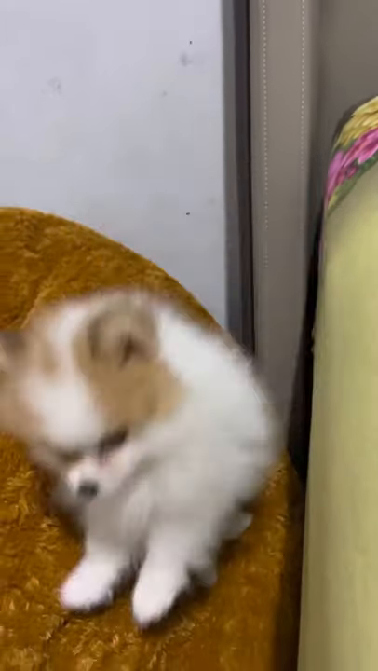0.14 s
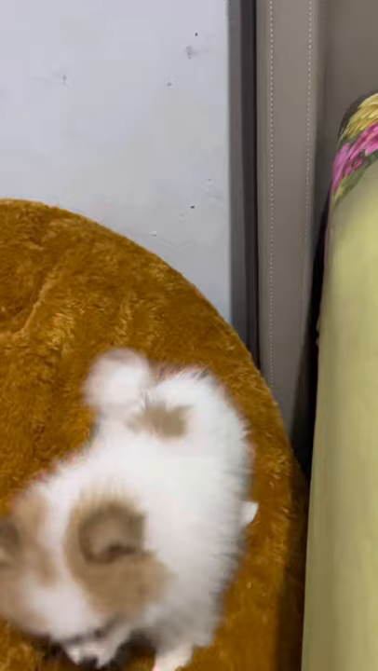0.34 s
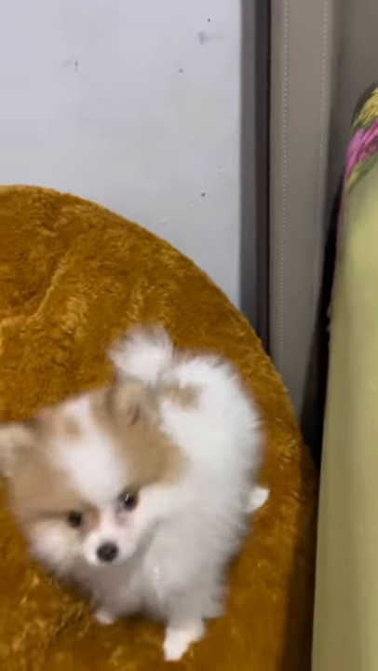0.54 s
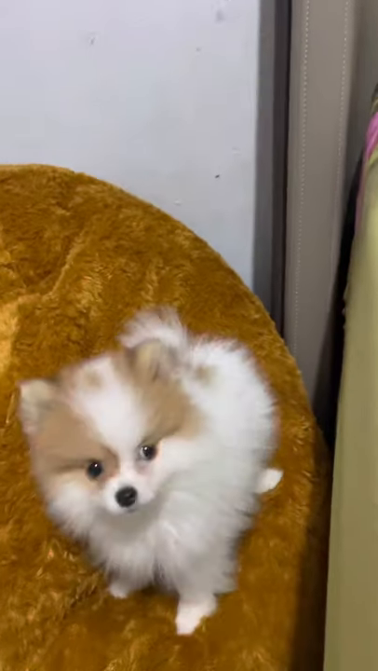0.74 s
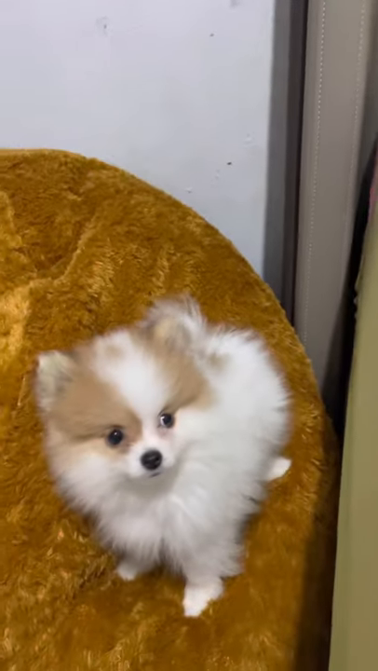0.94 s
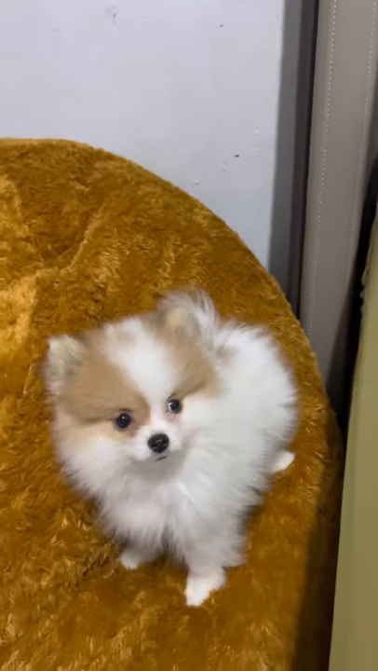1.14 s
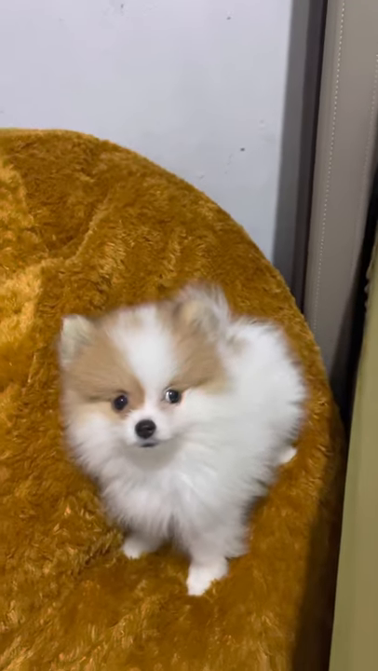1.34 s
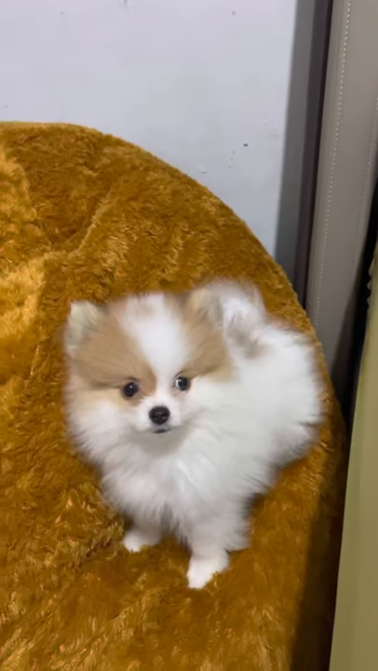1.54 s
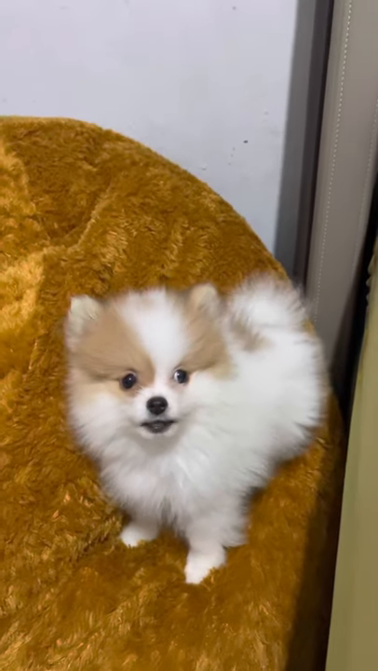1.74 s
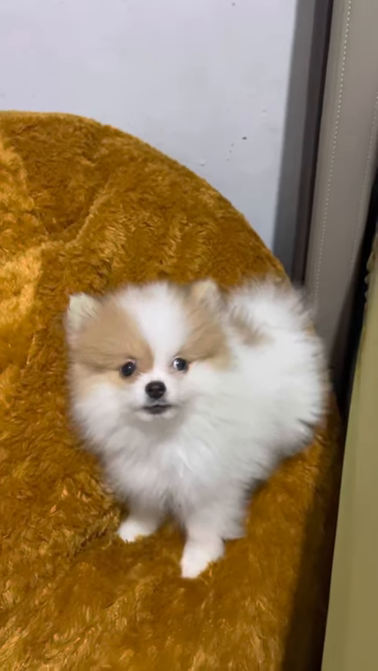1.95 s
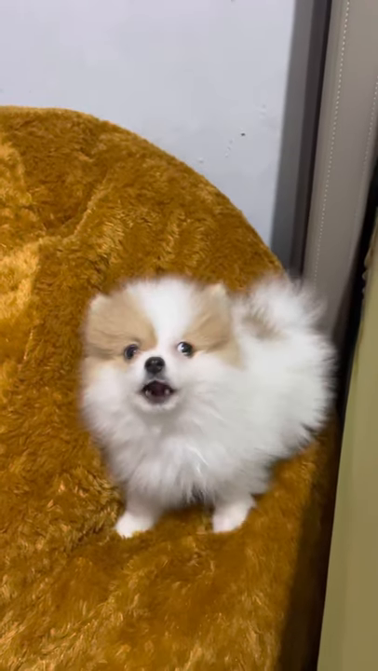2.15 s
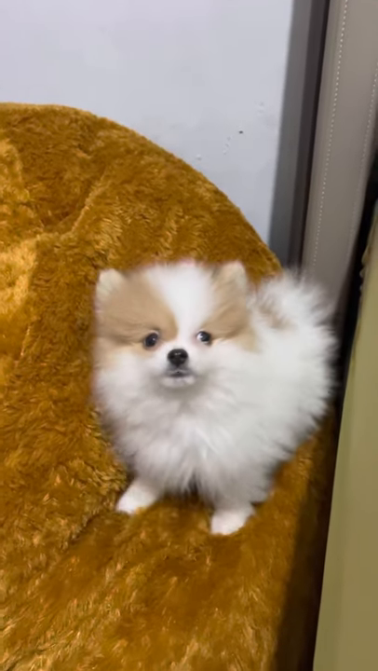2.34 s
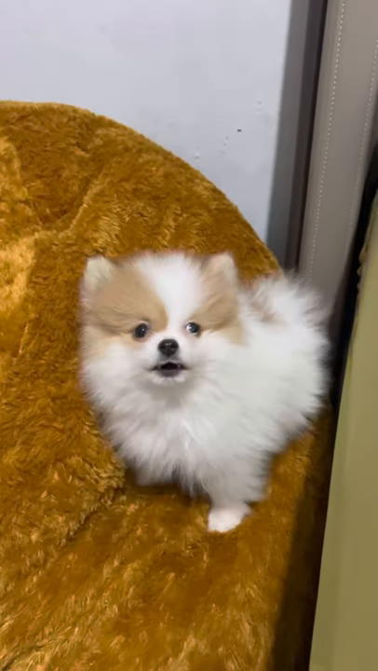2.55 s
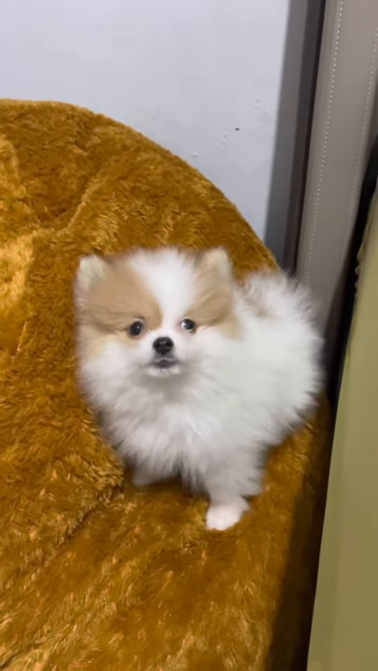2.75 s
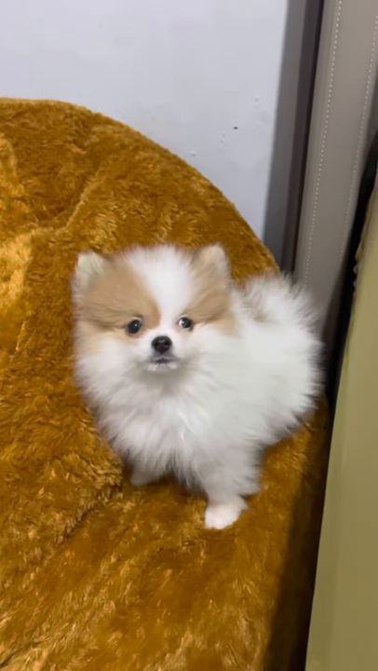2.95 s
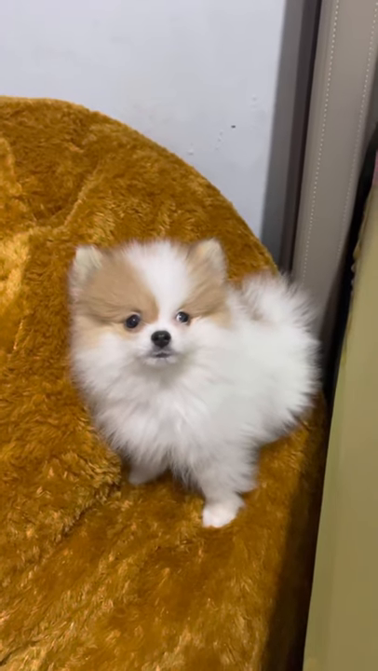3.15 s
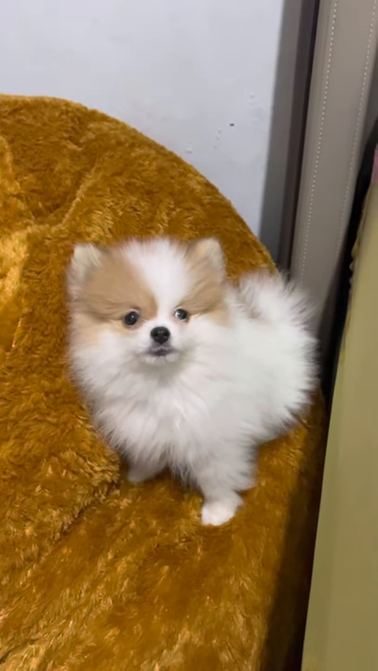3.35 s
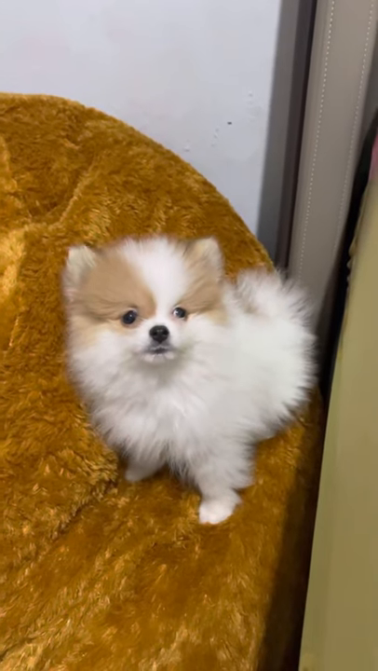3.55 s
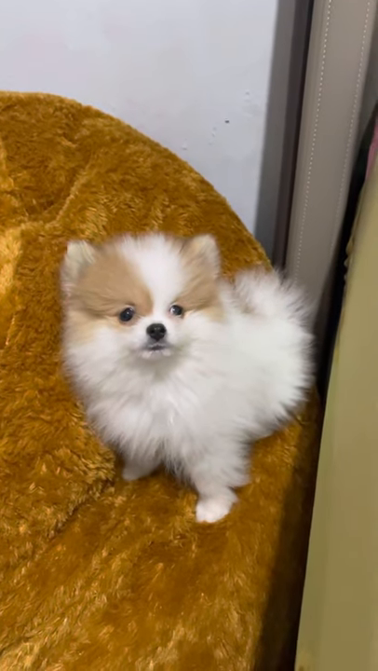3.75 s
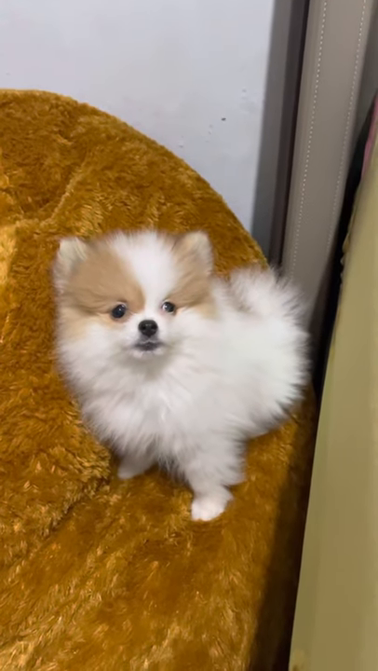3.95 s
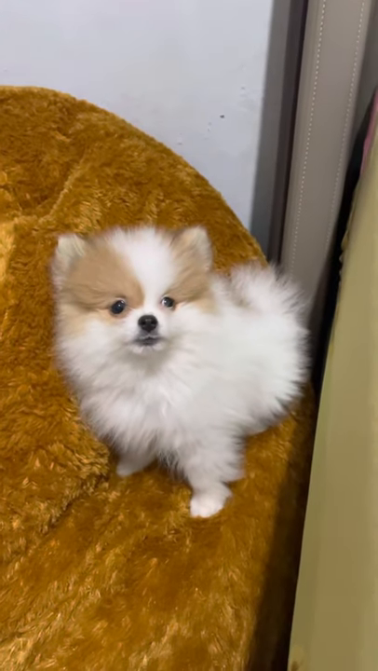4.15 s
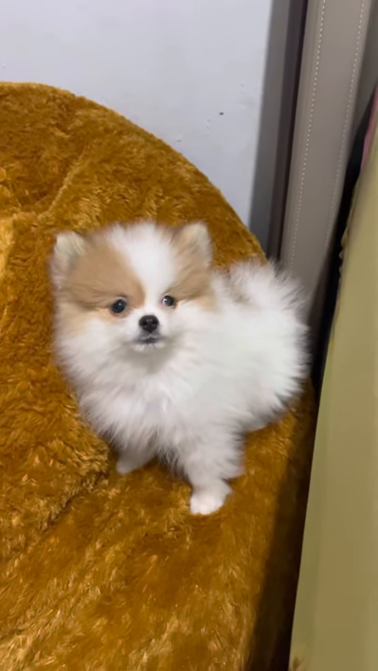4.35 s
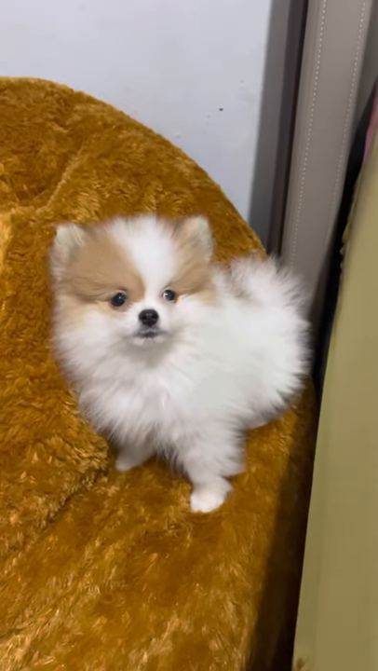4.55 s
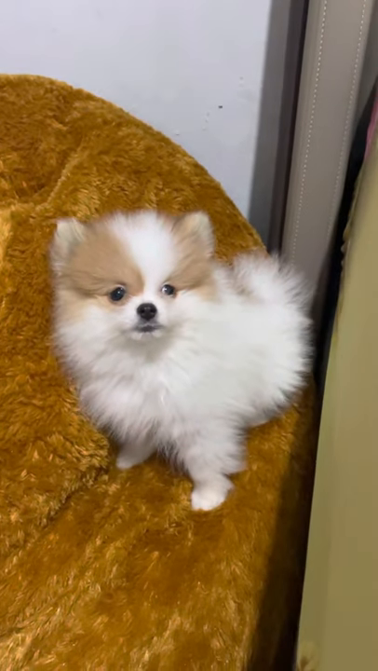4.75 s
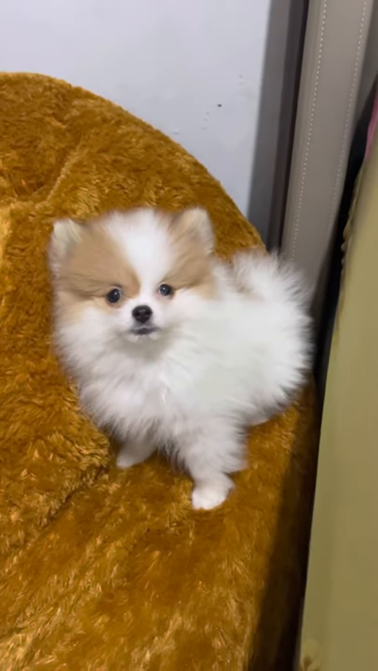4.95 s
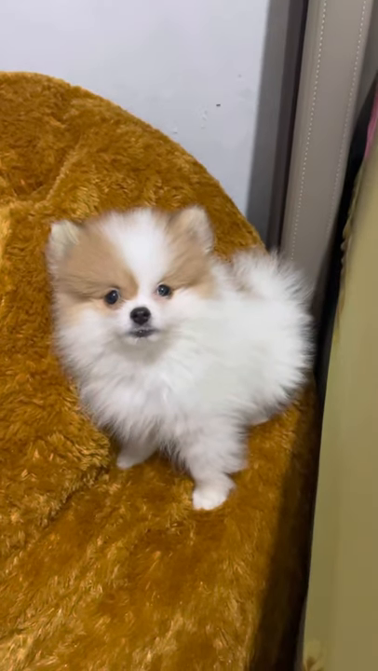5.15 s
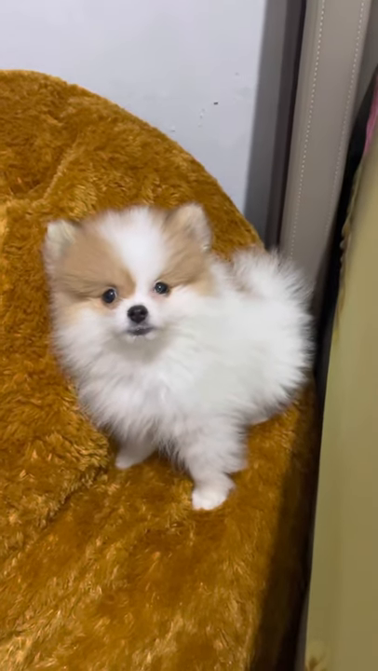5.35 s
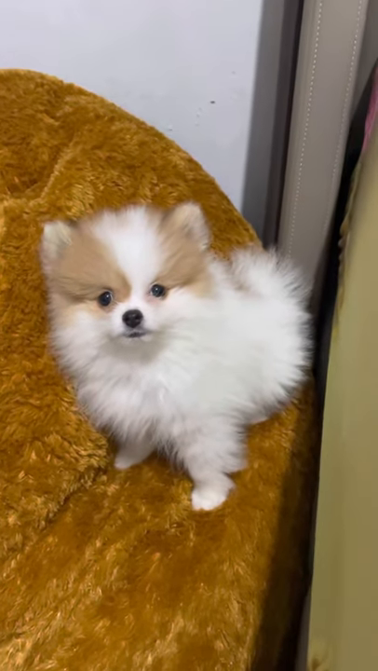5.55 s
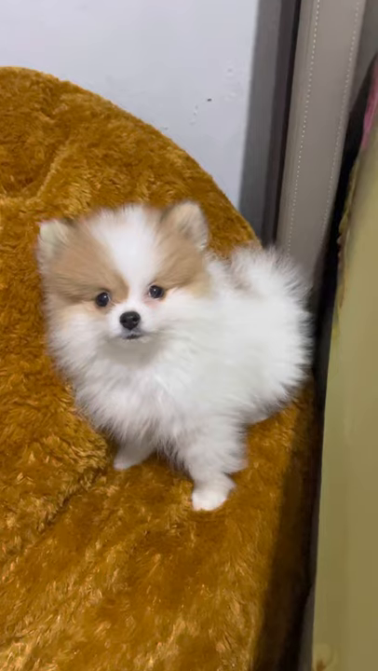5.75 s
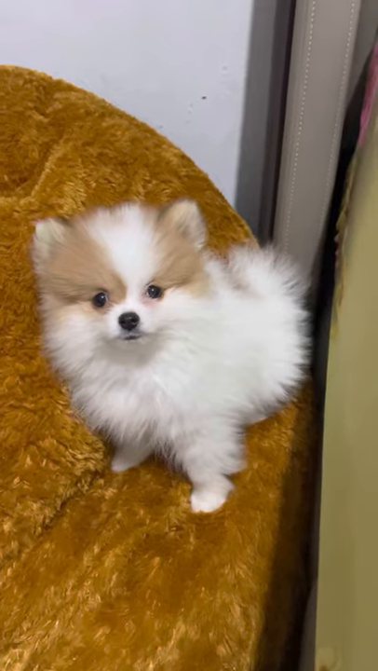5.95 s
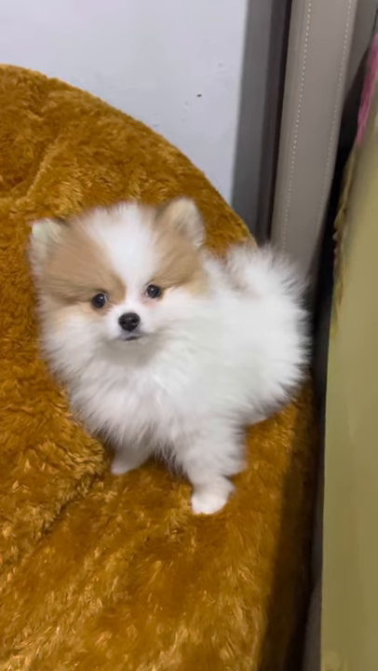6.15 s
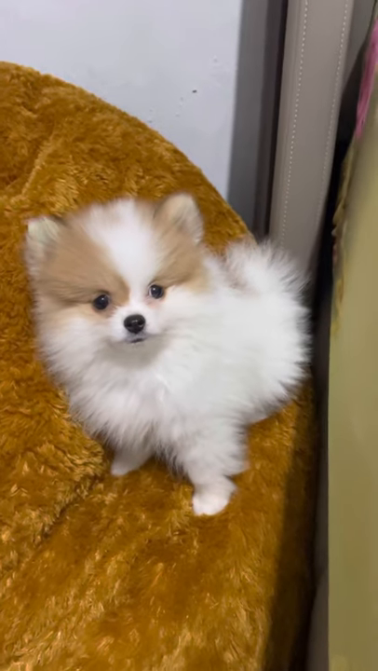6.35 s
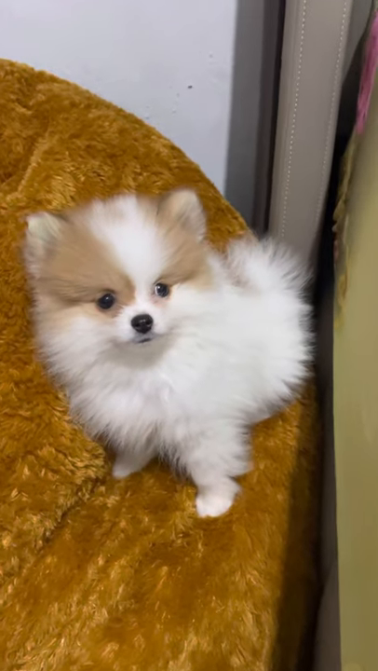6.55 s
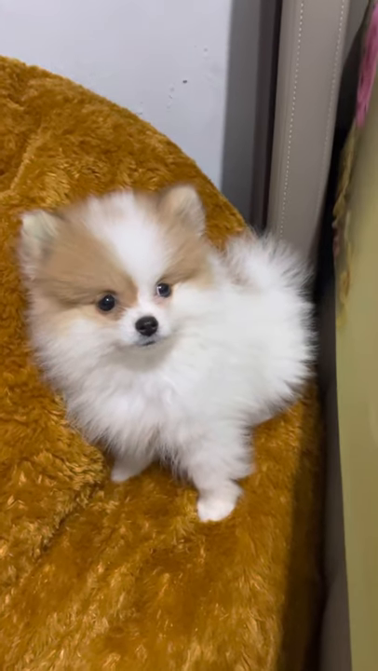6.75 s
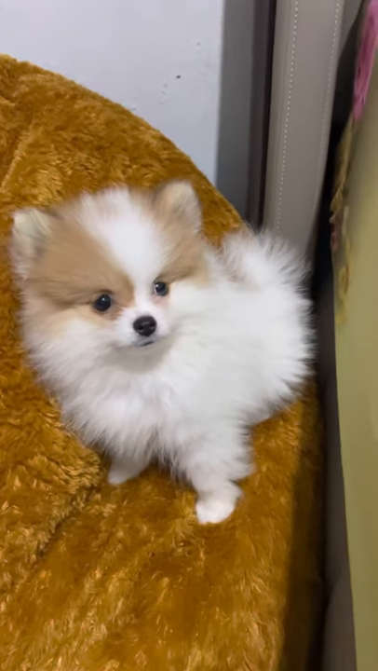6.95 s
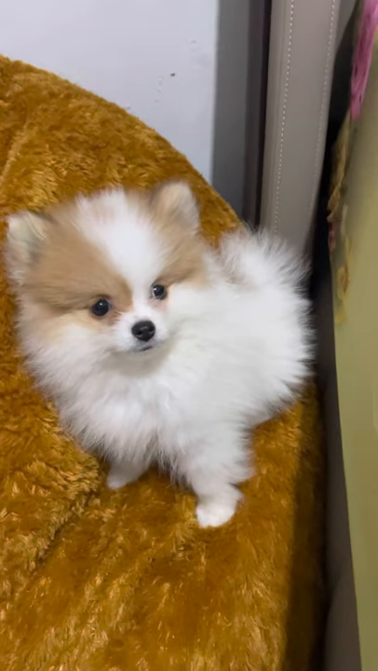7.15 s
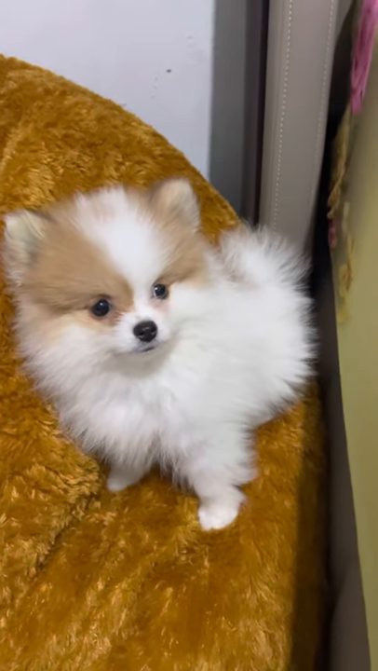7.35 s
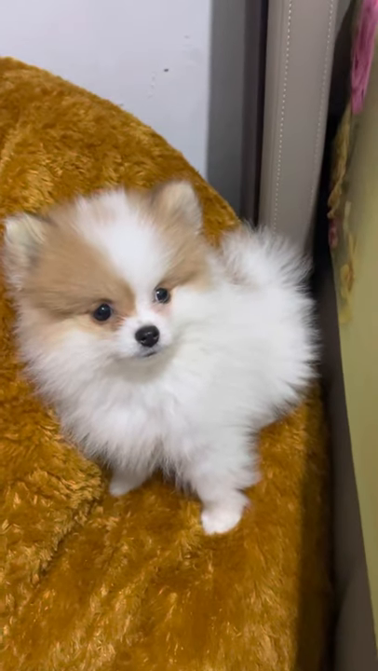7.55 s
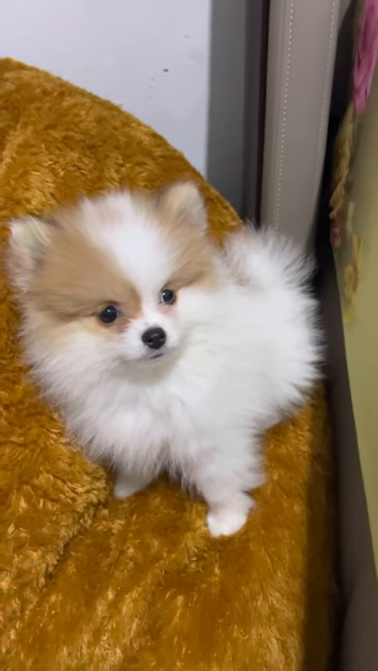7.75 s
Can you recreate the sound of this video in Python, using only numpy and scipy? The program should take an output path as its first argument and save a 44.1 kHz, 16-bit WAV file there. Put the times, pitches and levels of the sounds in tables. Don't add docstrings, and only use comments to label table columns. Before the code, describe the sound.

A small fluffy puppy vocalises near the microphone indoors. Brief fur and cloth rustling comes first, then barely audible peeps and a thin squeak leading into the loudest yelp. Next come a nasal whine, a quick yap breaking into throaty grumbling, a sliding wail with a low groan, and tiny descending whimpers. After that only faint motor hum and soft room noise continue.

```python
import sys
import numpy as np
from scipy import signal
from scipy.fft import rfft, irfft, next_fast_len
from scipy.io import wavfile
from scipy.ndimage import uniform_filter1d

SR = 44100
rng = np.random.default_rng(int(sys.argv[2]) if len(sys.argv) > 2 else 0)


def gain_from_db(level_db):
    decades = np.asarray(level_db, float) / 20
    return 10 ** decades


def bounce(signal):
    frames = np.transpose(np.atleast_2d(signal))
    limited = np.clip(frames, -1, 1)
    pcm = np.round(limited * 32767).astype(np.int16)
    wavfile.write(sys.argv[1], SR, pcm)


N = 343655

# start_s, pitch_hz, effort_db, mouth_opening_0_1
PEEP_NOTES = [
    [(.158, 1420, -60, .5), (.164, 1320, -48, .45), (.178, 1128, -57, .35)],
    [(1.364, 1388, -66, .5), (1.37, 1290, -48, .72), (1.377, 1150, -46, .72), (1.386, 1013, -62, .4)],
]
SQUEAK_NOTES = [
    [(1.72, 1833, -52, .6), (1.727, 1880, -36, .65), (1.731, 1902, -24, .8), (1.739, 1880, -23.5, .85),
     (1.745, 1590, -23.5, .95), (1.753, 1545, -23.5, .95), (1.77, 1800, -24, .88), (1.79, 1770, -25.5, .85),
     (1.806, 1600, -28, .8)],
    [(1.806, 1600, -28, .7), (1.812, 1390, -24, .7), (1.819, 1290, -23.5, .8), (1.824, 1192, -30, .95)],
]
YELP_NOTES = [
    [(2.006, 1146, -41, .4), (2.011, 1145, -19, 1.15), (2.022, 1165, -16, 1.08), (2.027, 1195, -15, 1.03)],
    [(2.027, 690, -15, .55), (2.032, 655, -17, .55), (2.044, 672, -12.5, .52)],
    [(2.044, 672, -11.5, .52), (2.069, 735, -12, .57), (2.115, 761, -17, .58)],
    [(2.115, 761, -16, .6), (2.126, 810, -16.5, .6), (2.135, 800, -15, .6), (2.143, 778, -16, .57)],
    [(2.143, 778, -15, .57), (2.15, 772, -14, .57), (2.164, 750, -16.5, .57), (2.171, 733, -32, .52)],
    [(2.173, 1357, -17, .55), (2.184, 1310, -19, .45), (2.198, 1247, -36, .6)],
    [(2.222, 439, -46, .15), (2.245, 385, -38, .05), (2.271, 330, -40, .05), (2.3, 310, -40, .1),
     (2.318, 274, -37, .1), (2.338, 334, -41, -.3)],
]
WHINE_NOTES = [
    [(2.528, 1100, -43, .4), (2.552, 1106, -25, .85), (2.575, 1162, -29, .85), (2.6, 1122, -34, .85)],
    [(2.6, 1122, -31.5, .7), (2.632, 1052, -32, .55), (2.66, 1109, -32, .49), (2.7, 1062, -33, .49),
     (2.776, 1033, -33, .46), (2.794, 963, -29, .4)],
    [(2.794, 963, -29, .4), (2.806, 830, -27, .29), (2.84, 812, -28.5, .22), (2.905, 800, -31.5, .15)],
    [(2.905, 800, -30, .1), (2.909, 790, -30, .1), (2.912, 780, -37, .15), (2.916, 765, -33, .2),
     (2.922, 749, -53, .2)],
]
YAP_NOTES = [
    [(3.439, 1141, -38, .7), (3.442, 1120, -25, .7), (3.448, 1086, -24, .4)],
    [(3.448, 553, -24, .62), (3.465, 552, -18, .62), (3.471, 609, -19, .62), (3.489, 726, -22, .52)],
    [(3.489, 1135, -22, .8), (3.503, 1105, -23.5, .76), (3.514, 1055, -25.5, .5), (3.536, 920, -24, .22),
     (3.561, 775, -29, .15), (3.571, 723, -31, .12), (3.58, 825, -33, .1)],
    [(3.585, 861, -41, .15), (3.596, 900, -33.5, .15), (3.612, 905, -46, .2)],
]
GRUMBLE_NOTES = [
    [(3.618, 165, -45, -.1), (3.64, 175, -40, .01), (3.66, 192, -36.5, .06), (3.68, 207, -37.5, .11),
     (3.698, 221, -40, .15)],
    [(3.7, 160, -42, .12), (3.72, 168, -37, .13), (3.74, 174, -39.5, .15)],
    [(3.742, 150, -41, .07), (3.768, 160, -38.5, .1), (3.782, 160, -44, .1), (3.815, 157, -45.5, .07),
     (3.84, 152, -50, .05)],
]
WAIL_NOTES = [
    [(4.112, 1016, -55.5, .3), (4.125, 1127, -35.5, .55), (4.135, 1021, -35, .6), (4.155, 1070, -31, .62),
     (4.175, 902, -26, .52), (4.208, 833, -26, .25), (4.263, 836, -27.5, .12), (4.28, 860, -26.5, .08),
     (4.292, 885, -31, .12)],
    [(4.292, 214, -32, .15), (4.306, 212, -31, .15), (4.362, 220, -36.5, .15), (4.378, 222, -35, .01),
     (4.393, 219, -39, .15), (4.43, 206, -39.5, .1), (4.47, 207, -41, .06), (4.484, 200, -42, .01)],
    [(4.486, 182, -34.5, -.4), (4.5, 179, -53, -.4)],
]
WHIMPER_NOTES = [
    [(4.759, 289, -52, .1), (4.772, 283, -39, .14), (4.783, 279, -39.5, .13)],
    [(4.785, 933, -44, .4), (4.797, 1070, -39, .45), (4.811, 980, -41, .45)],
    [(4.813, 894, -38, .2), (4.82, 880, -33.5, .25), (4.832, 860, -63, .25)],
    [(5.073, 1230, -52, .6), (5.078, 1170, -41, .62), (5.096, 1115, -37, .68), (5.126, 1132, -37.5, .65),
     (5.15, 1030, -37.5, .55), (5.171, 900, -34, .25)],
    [(5.174, 860, -42, .12), (5.178, 840, -35, .12), (5.183, 810, -60, .12)],
]
LAST_WHIMPER_NOTES = [
    [(5.432, 1120, -51.5, .55), (5.447, 1110, -40, .68), (5.462, 962, -46, .25)],
    [(5.465, 732, -42.5, .05), (5.472, 757, -37, .2), (5.477, 775, -53, .2)],
]

# tilt_db_per_octave, odd_over_even_db, edge_db, edge_slope_db_per_octave
FOLD_SETTINGS = [(-6, .1, -22, -6), (-3, .1, -34, 3), (4, -1, -12, 4), (1, -5, -28, 1), (.1, 6, -6, -2.5),
                 (7.5, -4.5, -6, -.2), (7.5, -4.5, .8, -.2), (8, .1, -14, 2), (6, .1, -22, .1),
                 (-3, .1, -25, -13), (-10, .1, -18, -12), (-1, -6, -10, 1), (-4, -10.5, -19, 3),
                 (-5, -8, -30, 3), (-4, .1, -40, -10), (4, 3, -8, .6), (1, 5, -5, -2), (1, 2, -14, -3),
                 (-6, .1, -30, -3), (-11, -10, -21, -7), (-9, 8, -20, -7), (-6, 4, -22, -7),
                 (-3, -3, -25, 5), (-12, -5, -10, -8), (-10, -15, -30, -12), (-11, 2, -34, -14),
                 (-8, -10, -52, -9), (-8, .1, -48, -9), (-5, -9, -29, 7), (-10, .1, -38, -7),
                 (-7, -12, -46, 3), (-4, .1, -42, -7)]
ROUGHNESS = [.1, .15, .12, .25, .13, .04, .018, .3, .07, .05, .14, .05, .007, .015, .15, .35, .09, .11, .1,
             .22, .33, .3, .008, .16, .15, .2, .04, .12, .012, .2, .04, .2]
# centre_hz, gain_db, centre_hz, gain_db, .., fundamental_db
THROAT_CAVITIES = [(3000, .1, 6000, .1, .1), (3000, .1, 6000, .1, .1), (7200, -12, 6200, 6, .1),
                   (4000, -7, 5400, 6, .1), (4600, -7, 8100, -8, 9250, -18, 2320, -3, .1),
                   (3340, 4, 2670, -3, 6600, -5, 8700, -12, 11),
                   (3050, 5, 7500, 4, 5600, 3, 3800, -3, 8900, -14, 8), (3100, 3, 6200, 2, .1),
                   (7200, -7, 5300, .1, 4600, 6, -4), (2620, 16, 5300, -17, .1), (3000, .1, 6000, .1, .1),
                   (4450, 5, 5600, -7, 3480, -9, .1), (4300, 7, 7500, -7, .1), (2560, -4, 6400, 6, .1),
                   (3000, .1, 6000, .1, .1), (3300, 5, 6500, 3, .1), (2200, -10, 4000, -8, .1),
                   (2500, 7, 4450, 11, 6600, 6, 5200, -9, 3850, -9, -3), (4500, 5, 6000, .1, .1),
                   (4500, 6, 6200, 4, .1), (1400, -5, 6200, 4, .1), (1400, -5, 6200, 4, .1),
                   (2400, 5, 6700, 5, 2900, -9, 4600, -6, .1), (1280, -12, 1060, 7, 1490, 5, 1930, 2, .1),
                   (3000, .1, 6000, .1, .1), (3000, .1, 6000, .1, .1), (3000, .1, 6000, .1, .1),
                   (3000, .1, 6000, .1, .1), (3300, -2, 6000, -4, 5100, 8, 4200, -5, .1),
                   (3000, .1, 6000, .1, .1), (3300, .1, 6000, .1, .1), (3000, .1, 6000, .1, .1)]
# start_s, end_s, flap_hz, depth_0_1
TISSUE_FLAPS = [
    (2.116, 2.147, 268, .26),
    (2.553, 2.598, 212, .17),
]
# freq_hz, gain_db
THROAT_COLOUR = [(300, -15), (900, -1), (1500, 5.5), (3000, -3.5), (4200, -14), (4550, -13), (4850, -20),
                 (5150, -9), (6800, -10.5), (7500, -27), (8500, -32), (9000, -39.5), (11000, -40.5),
                 (12500, -34), (14000, -32), (15800, -42.5)]
# start_s, peak_db, centre_hz
TICK_EVENTS = [(1.684, -58, 6700), (1.684, -60, 5200), (1.693, -35, 1910), (1.693, -55, 6600),
               (1.81, -40, 9000), (2.913, -44, 2500), (4.027, -66, 2100), (4.213, -58, 5200),
               (2.008, -30, 1500), (2.0275, -9, 1700), (2.029, -7, 1650), (3.622, -36, 900),
               (3.718, -34, 900), (3.832, -42, 400), (5.075, -48, 2400), (2.17, -22, 3900),
               (2.172, -34, 6800), (3.49, -11, 2600)]

# freq_hz, gain_db
NOSE_COLOUR = [(2500, -30), (4200, -15.5), (5300, -0.2), (6600, -2.5), (7800, -16.5), (9000, -19.5),
               (11200, -16), (13300, -5), (14700, -10), (15600, -24)]
# time_s, level_db
SNIFF_LEVEL = [
    (0, -94),
    (1.6, -91),
    (2.5, -85),
    (5.3, -88),
    (5.6, -98),
    (7.8, -97),
]
# peak_s, peak_db, rise_20db_s, fall_20db_s
SNORT_EVENTS = [
    (3.42, -61, .004, .06),
    (3.51, -52, .05, .08),
    (1.81, -46, .05, .02),
    (2.003, -60, .02, .02),
    (4.49, -75, .02, .04),
    (5.345, -63, .001, .003),
    (5.352, -64, .001, .006),
]
# peak_s, peak_db, rise_20db_s, fall_20db_s
RUSTLE_EVENTS = [
    (.2, -51, .014, .1),
    (.225, -45, .03, .08),
    (.28, -53, .06, .025),
    (.32, -58, .4, .3),
    (1.37, -68, .04, .36),
]
# freq_hz, density_db_per_hz
FUR_COLOUR = [(180, -21), (300, -10), (378, -17.5), (404, -6), (439, -12), (601, -18), (1110, -9),
              (2400, -13), (4300, -22), (5600, -17), (6640, -17), (9090, -15), (9870, -17), (12000, -16.5),
              (15700, -17)]

# freq_hz, gain_db, phase_rad
PORT_RATIO = [(100, -2, 0.05), (340, -8, .2), (520, -10, 1.), (700, -8, 1.5), (860, -6, 1.5),
              (1030, -3.5, 1.), (1380, -3, .4), (1720, -2, .08), (2240, -2.5, -.3), (3400, -1.5, -.3),
              (4300, 2, -.9), (5170, 4, .2), (6000, .2, -.75), (6900, 0.1, -1.35), (7900, 0.1, -2.1),
              (9000, -1, -2.5), (11000, -2, -3.7), (12900, 0.1, -4.7), (14600, 0.1, -6.25)]
# freq_hz, t60_s
ROOM_DECAY = [(400, 0.42), (1500, 0.56), (4000, 0.68), (12000, 0.5)]
# freq_hz, width_hz, level_db
HUM_TONES = [(62, 25, -64.5), (99.9, 24, -61.5), (114.8, 2.3, -61.5), (412.8, 2.5, -65.5), (510.9, 4, -66),
             (1568, 4, -87)]
# time_s, gain_db
UPPER_HUM_FADE = [(0, 5), (3, 4), (5.5, 1.9), (7.8, -1)]
# freq_hz, density_db_per_hz
AIR_SUM_COLOUR = [(20, -38.5), (50, -4.5), (100, 2.75), (170, -3.5), (310, -1.5), (630, -11), (1000, -16),
                  (2000, -24.5), (3300, -32), (5000, -39), (8200, -48), (9200, -70), (11200, -69),
                  (13000, -40.5), (15700, -52.5)]
# freq_hz, density_db_per_hz
AIR_DIFF_COLOUR = [(20, -30), (60, -6.5), (250, -14.5), (600, -8.5), (1600, -27.5), (2200, -34),
                   (2800, -27.5), (3900, -40.5), (5000, -38), (7000, -47), (12700, -51), (15000, -63)]
# freq_hz, likeness_0_1
AIR_LIKENESS = [(60, 0.75), (300, .7), (640, 0.48), (1400, 0.02)]

SHUT_HZ, OPEN_OCTAVES, MOUTH_Q = 700, 2.0, 4.5
SOFTEN = .45
MUFFLE_DB = 22
BREATH_DB = -4
LOWEST_HZ = 315
LIPS_HZ, LIPS_OCTAVES = 1150, 7.0
CAVITY_WIDE_HZ, CAVITY_Q = 450, 8
FAR_WALL_S, FAR_WALL_WIDE_S, FAR_WALL_DB = .27, .05, 8
STIR_HZ, STIR = 190, 2.4
AIR_SUM_DB, AIR_DIFF_DB = -56, -63
DRAUGHT_S, DRAUGHT_WIDE_S, DRAUGHT_DB = 6.8, .7, 4


def evened(x):
    return x / np.sqrt(np.mean(abs(x) ** 2) + 1e-20)


def read(points, hz, order=1):
    table = np.transpose(points)
    return np.interp(np.log(hz + 1), np.log(table[0] + 1), table[order])


def along(rows, t):
    s, *columns = np.transpose(rows)
    return [np.interp(t, s, c) for c in columns]


def add(mix, s, sound):
    part = mix[max(round(s * SR), 0):][:len(sound)]
    part += sound[:len(part)]


def coloured(x, points):
    size = next_fast_len(len(x) + 512)
    gain = gain_from_db(read(points, np.fft.rfftfreq(size, 1 / SR)))
    return irfft(rfft(x, size) * gain, size)[:len(x)]


def wobble(size, hz):
    z = rng.standard_normal((size + 2000, 2)) @ [1, 1j]
    r = np.exp(-np.pi * hz / SR)
    return evened(signal.lfilter([1], [1, -2 * r, r * r], z)[2000:])


def drift(hz):
    return wobble(N // 16 + 1, 16 * hz).repeat(16)[:N]


def swells(events):
    t = np.arange(N) / SR
    return sum(gain_from_db(db - 20 * np.maximum((s - t) / rise, (t - s) / fall)) for s, db, rise, fall in events)


def overtone_levels(k, hz, effort_db, mouth, cavities, tilt_db, odd_db, edge_db, slope_db):
    f = k * hz
    weak_db = SOFTEN * (effort_db - effort_db.max())
    tract = gain_from_db(read(THROAT_COLOUR, f)) * (f < 15700) / np.hypot(1, (LOWEST_HZ / f) ** 4)
    ratio = f / (SHUT_HZ * 2 ** (OPEN_OCTAVES * mouth))
    mouth_loss = np.hypot(1 - ratio ** 2, ratio / MOUTH_Q)
    body = tract * gain_from_db((tilt_db + weak_db) * np.log2(k) + odd_db * (k % 2)) / mouth_loss
    body = body / np.linalg.norm(body, axis=0)
    high = tract * gain_from_db(slope_db * np.log2(k)) * (k > 2)
    high = high / np.linalg.norm(high[3:], axis=0)
    edge_db = edge_db + weak_db + MUFFLE_DB * (mouth - mouth.max())
    level = np.hypot(body, gain_from_db(edge_db) * high)
    *bumps, first_db = cavities
    shape_db = first_db * (k == 1)
    for centre_hz, db in zip(bumps[::2], bumps[1::2]):
        width_hz = min(CAVITY_WIDE_HZ, centre_hz / CAVITY_Q)
        shape_db = shape_db + db * np.exp(-((f - centre_hz) / width_hz) ** 2)
    level = level * gain_from_db(shape_db)
    return level * gain_from_db(effort_db) / np.linalg.norm(level, axis=0)


def voice(rows, turn, rough, cavities, tilt_db, odd_db, edge_db, slope_db):
    edge_s = .002
    t = np.arange(round((rows[0][0] - edge_s) * SR), round((rows[-1][0] + edge_s) * SR)) / SR
    hz, effort_db, mouth = along(rows, t)
    hz = uniform_filter1d(hz, size=220, mode="nearest")
    shake = wobble(len(t), .45 * hz.mean())
    steady = turn + np.cumsum(hz) / SR
    flap = 0j * t
    for s, end, flap_hz, depth in TISSUE_FLAPS:
        gate = np.clip(np.minimum(t - s, end - t) / .004, 0, 1)
        flap = flap + depth * gate * np.exp(2j * np.pi * flap_hz * t)
    turns = steady + 0.11 * rough * shake.imag + 0.03 * flap.imag

    k = np.arange(1, min(15500 / hz.min(), 40))[:, None]
    level = overtone_levels(k, hz, effort_db, mouth, cavities, tilt_db, odd_db, edge_db, slope_db)
    lag = 0.28 * k ** 2
    folds = np.sqrt(2) * (level * np.cos(2 * np.pi * k * turns + lag)).sum(0)
    folds = folds * (1 + rough * shake.real + flap.real) / np.hypot(1, rough)

    puffs = (1.0 + np.exp(-(turns % 1) / .3)) * rng.standard_normal(len(t))
    colour = [(f, db + slope_db * np.log2(np.clip(f, 1000, 7000) / 1000)) for f, db in THROAT_COLOUR]
    breath = rough * gain_from_db(BREATH_DB + effort_db) * evened(coloured(puffs, colour))

    fade = np.clip(np.minimum(t - t[0], t[-1] - t) / (2 * edge_s), 0, 1)
    lips_hz = min(LIPS_HZ * 2 ** (LIPS_OCTAVES * max(mouth.max(), 0)), .45 * SR)
    low_hz = .7 * max(hz.min(), LOWEST_HZ)
    band = signal.butter(3, [low_hz, lips_hz], "band", fs=SR, output="sos")
    sound = signal.sosfiltfilt(band, (folds + breath) * fade, padtype=None)
    return t[0], sound, steady[-round(2 * edge_s * SR)]


def puppy():
    out, turn = np.zeros(N), 0
    notes = (PEEP_NOTES + SQUEAK_NOTES + YELP_NOTES + WHINE_NOTES + YAP_NOTES + GRUMBLE_NOTES
             + WAIL_NOTES + WHIMPER_NOTES + LAST_WHIMPER_NOTES)
    for rows, rough, folds, cavities in zip(notes, ROUGHNESS, FOLD_SETTINGS, THROAT_CAVITIES):
        s, sound, turn = voice(rows, turn, rough, cavities, *folds)
        add(out, s, sound)
    out = out + nose(out)
    add_ticks(out)
    return out


def nose(cries):
    r = np.exp(-1 / (0.0067 * SR))
    power = np.roll(uniform_filter1d(cries ** 2, size=600), -200)
    power = signal.lfilter([1 - r], [1, -r], power)
    effort_db = 10 * np.log10(abs(power) + 1e-14)
    sniffs = gain_from_db(along(SNIFF_LEVEL, np.arange(N) / SR)[0] + 5.5 * drift(22).real)
    level = gain_from_db(-51.5 + 0.66 * effort_db) + sniffs + swells(SNORT_EVENTS)
    return level * evened(coloured(rng.standard_normal(N), NOSE_COLOUR))


def add_ticks(out):
    t = np.arange(200) / SR
    for s, db, hz in TICK_EVENTS:
        noise = 0.36 * coloured(rng.standard_normal(200), THROAT_COLOUR)
        decay = gain_from_db(db - 60 * t / .004) * np.minimum(t / .0004, 1)
        add(out, s, decay * (np.sin(2 * np.pi * hz * t) + noise))


def rustle():
    grain_db = 1.2 * rng.exponential(1, N // 30 + 1).repeat(30)[:N]
    grains = rng.standard_normal(N) * gain_from_db(grain_db)
    return swells(RUSTLE_EVENTS) * evened(coloured(grains, FUR_COLOUR))


def ports(x):
    size = next_fast_len(N + 2048)
    hz = np.fft.rfftfreq(size, 1 / SR)
    right = gain_from_db(read(PORT_RATIO, hz)) * np.exp(1j * read(PORT_RATIO, hz, order=2))
    pair = np.array([np.ones_like(right), right]) * 2 / np.maximum(abs(1 + right), 1)
    return irfft(rfft(x, size) * pair, size)[:, :N]


def room(x):
    taps = np.zeros((2, SR // 2))
    at = np.arange(300, SR // 2 - 20, 20)
    at = at + rng.integers(0, 20, (2, len(at)))
    np.put_along_axis(taps, at, rng.choice([-1., 1.], at.shape), 1)
    hz, t, z = signal.stft(taps, SR, nperseg=256)
    decay_db = -60 * t / np.maximum(read(ROOM_DECAY, hz), .05)[:, None]
    far_wall_db = FAR_WALL_DB * np.exp(-((t - FAR_WALL_S) / FAR_WALL_WIDE_S) ** 2)
    tail = signal.istft(z * gain_from_db(decay_db + far_wall_db), SR, nperseg=256)[1]
    tail = tail / np.linalg.norm(tail[0])
    stirred = x * (1 + STIR * wobble(N, STIR_HZ).real) / np.hypot(1, STIR / np.sqrt(2))
    shared, own = signal.fftconvolve(stirred[None], tail, axes=1)[:, :N]
    return ports(shared) + .7 * own * np.array([[1], [-1]])


def hum():
    t = np.arange(N) / SR
    fade = gain_from_db(along(UPPER_HUM_FADE, t)[0])
    out = np.zeros(N)
    for hz, width_hz, db in HUM_TONES:
        upper = hz > 300
        hold = 3.5 if upper else .3
        tone = (np.exp(2j * np.pi * hz * t) * (drift(width_hz) + hold)).real
        out += gain_from_db(db) * np.sqrt(2) * tone / np.hypot(1, hold) * (fade if upper else 1)
    return out


def air():
    frames, hz = N // 256 + 5, np.fft.rfftfreq(1024, 1 / SR)
    a, b, c, d, patches = rng.standard_normal((frames, 513, 5)).T
    patches = evened(uniform_filter1d(uniform_filter1d(patches, 14, 0), 16, 1))
    frame_s = np.arange(frames) * 256 / SR
    draught_db = DRAUGHT_DB * np.exp(-((frame_s - DRAUGHT_S) / DRAUGHT_WIDE_S) ** 2)
    treble_db = np.outer(np.clip(np.log2(hz / 1500 + 1e-9), 0, 1), draught_db)
    lean = np.clip(read(AIR_LIKENESS, hz), -1, 1)[:, None]
    total = a + 1j * b
    diff = lean * total + np.sqrt(1 - lean ** 2) * (c + 1j * d)
    z = np.array([total, diff]) * gain_from_db(1.2 * patches + treble_db)
    z *= gain_from_db(np.array([read(AIR_SUM_COLOUR, hz), read(AIR_DIFF_COLOUR, hz)]))[:, :, None]
    total, diff = signal.istft(z, nperseg=1024, noverlap=768)[1][:, :N]
    total = gain_from_db(AIR_SUM_DB - 5.5) * evened(total)
    diff = gain_from_db(AIR_DIFF_DB) * evened(diff)
    return np.array([total + diff, total - diff])


def ducking(near):
    r = np.exp(-1 / (.1 * SR))
    power = signal.lfilter([1 - r], [1, -r], near ** 2)
    power_db = 10 * np.log10(power + 1e-12)
    return gain_from_db(-.7 * np.maximum(power_db + 29, 0))


def scene():
    near = puppy() + rustle()
    background = ports(hum()) + air()
    return ports(near) + gain_from_db(-18.5) * room(near) + ducking(near) * background


def top_cut(x):
    return signal.sosfilt(signal.butter(12, 15850, fs=SR, output="sos"), x)


def record(dry):
    mix = signal.lfilter(*signal.butter(2, 35, "high", fs=SR), dry)
    return top_cut(mix)


dry = scene()
out = record(dry)
bounce(out)
```